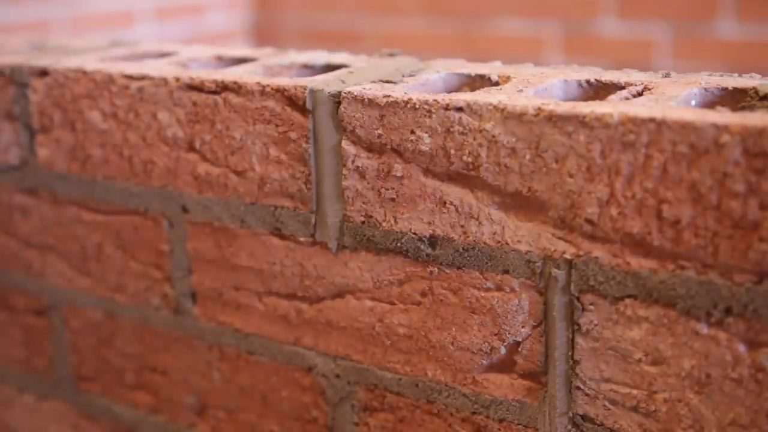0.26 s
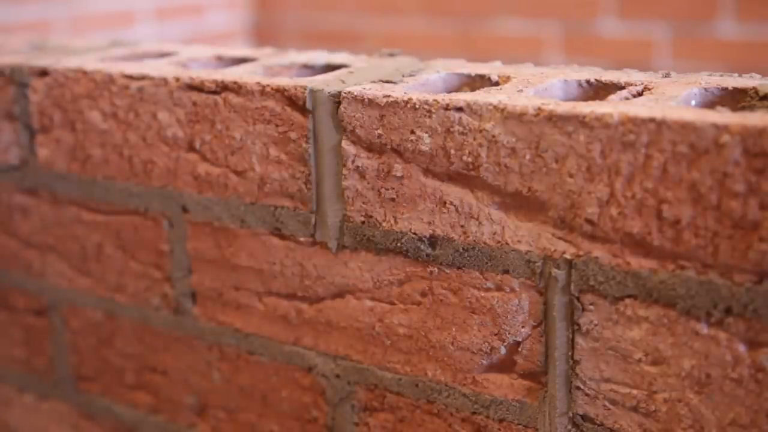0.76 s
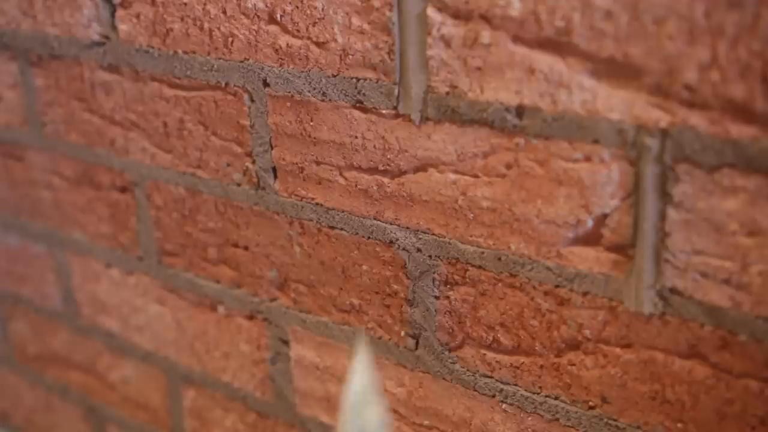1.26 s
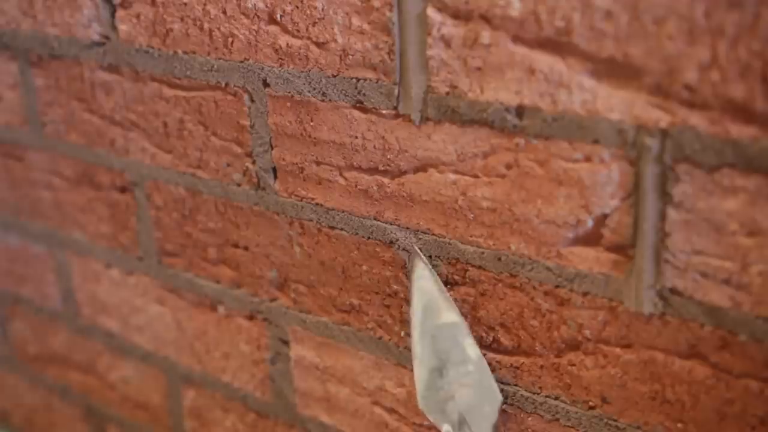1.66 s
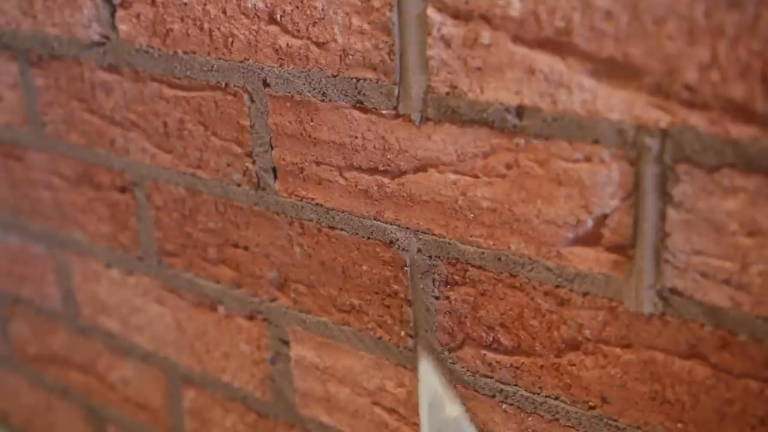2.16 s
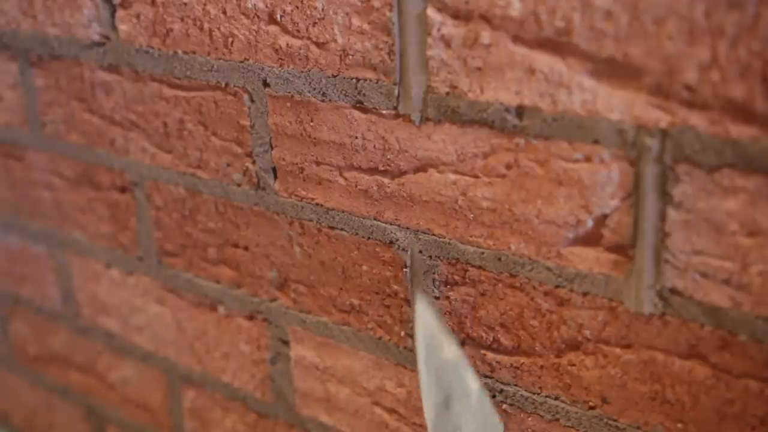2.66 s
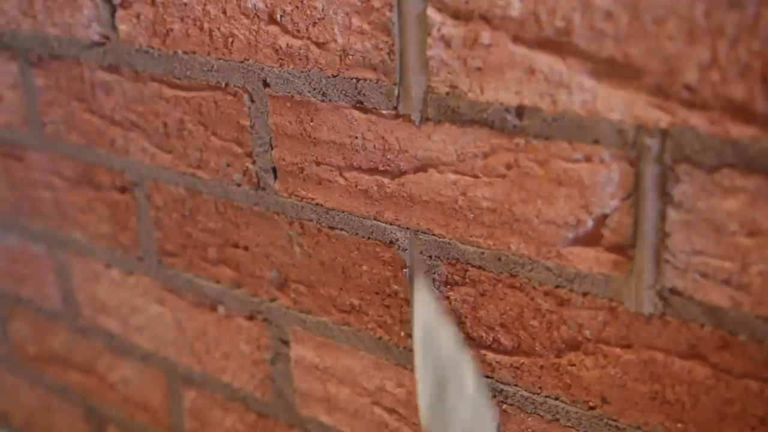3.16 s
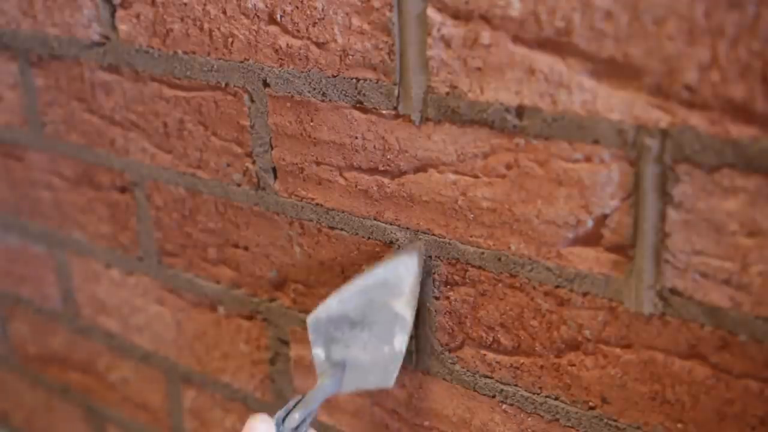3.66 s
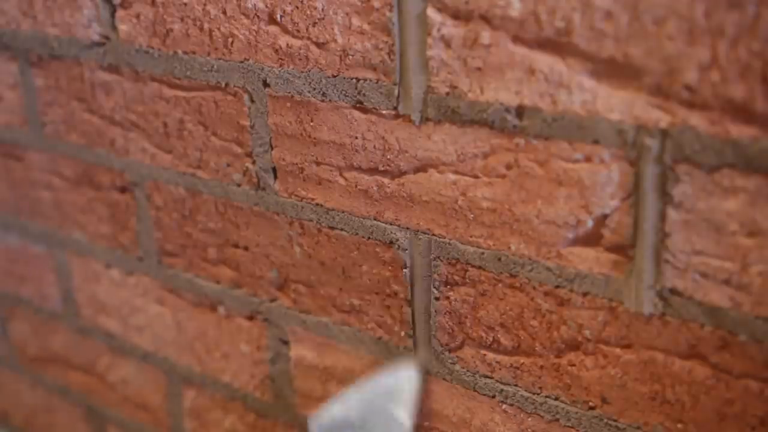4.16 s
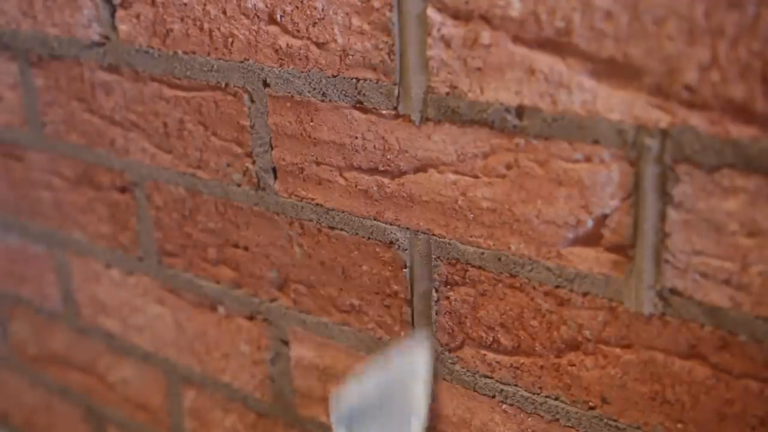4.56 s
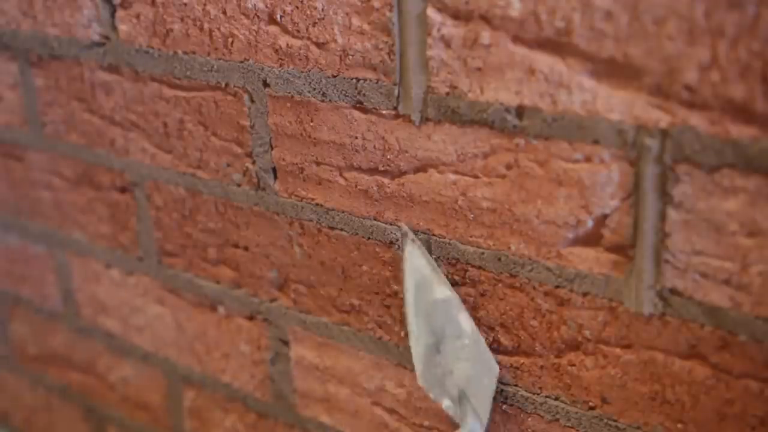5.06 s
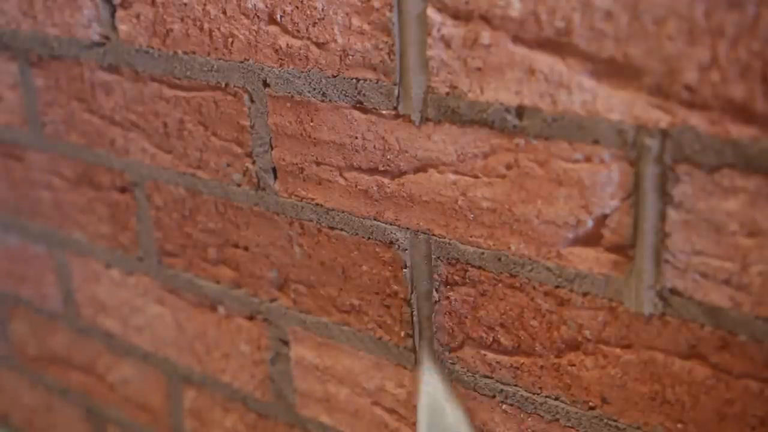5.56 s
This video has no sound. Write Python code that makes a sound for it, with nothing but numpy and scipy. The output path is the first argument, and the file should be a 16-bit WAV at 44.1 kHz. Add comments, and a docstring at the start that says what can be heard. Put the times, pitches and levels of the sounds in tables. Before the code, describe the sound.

After one light tap, a trowel tip scratches repeatedly through sandy mortar, its blade ringing briefly, over faint distant traffic.

```python
"""Outdoors at a brick wall, a steel pointing trowel works the fresh mortar joints.
Far traffic hums and handling rustles softly. The trowel is tapped once and bounces, and crumbs tick on
the wall. Then its tip is drawn six times along a joint: sand grinds under the blade, which the wall
muffles, and the tip catches on coarse grains and squeaks. Each time it lifts off, the blade rings on."""
import sys
import numpy as np
from scipy import signal
from scipy.fft import rfft, irfft, next_fast_len
from scipy.io import wavfile
from scipy.ndimage import uniform_filter1d

SR = 44100
rng = np.random.default_rng(int(sys.argv[2]) if len(sys.argv) > 2 else 0)


def unload_audio(sound):
    """Save the sound as a 16-bit wav file, at the path given as the first command line argument."""
    columns = np.transpose(np.atleast_2d(sound))
    # keep every value between -1 and 1, then stretch to whole-number steps
    steps = np.round(np.clip(columns, -1, 1) * 32767)
    wavfile.write(sys.argv[1], SR, steps.astype(np.int16))


N = 257103

# Noise colours, or how strong each noise is from low to high pitch: f/Hz, level/dB
AIR_COLOUR = [(15, -53.5), (25, -29.5), (53, -11.5), (80, -11.5), (105, -4), (130, -5.5), (300, -6),
              (380, -3.5), (450, -9.5), (650, -6.5), (1070, -9.5), (1600, -17), (2600, -29), (5000, -28.5),
              (16000, -40)]
HANDLING_COLOUR = [(150, -8.5), (400, 0), (1300, -6), (2300, -6.5), (5000, -12.5), (10000, -15.5),
                   (16000, -22.5)]
THUD_COLOUR = [(90, -40), (140, -20), (190, -7), (350, -5), (500, 21.5), (680, 16), (780, 11.5), (950, 18),
               (1200, 11.5), (1480, 20), (1800, -68), (3000, 4), (6000, -36)]
CRACK_COLOUR = [(200, -36), (700, -20), (1500, 3), (2400, -3.5), (4000, 0.5), (5700, -0.5), (7000, -4),
                (12000, -16.5), (16000, -25)]
# Soft rustles of handling: middle t/s, level/dB, half length/s
RUSTLE_SWELLS = [(0.13, -57, 0.067), (0.312, -53.5, 0.038), (0.395, -47.5, 0.038), (0.545, -57, 0.058),
                 (1.223, -51, .05)]

# A mode is one tone that a thing rings with; t60 is the time a sound takes to fade by 60 dB.
# Modes of what the trowel lands on: f/Hz, level/dB, t60/s
LANDING_MODES = [(176, -7, 0.25), (219, -13.5, 0.36), (298, -0.5, 0.083), (360, -6, 0.047), (502, 2, 0.18),
                 (518, -14, 0.18), (681, 2.5, 0.21), (866, 10, 0.053), (967, 7, 0.049), (1004, -14, 0.15),
                 (1110, -2, 0.035), (1470, -4, 0.049)]
# Modes of the blade pressed on the joint: f/Hz, width/Hz, level/dB
PRESSED_MODES = [(417, 260, -26), (822, 210, -20.5), (1880, 130, -22.5), (2730, 47, -36), (2838, 135, 1),
                 (3038, 200, -6.5), (3270, 110, -23.5), (4300, 110, -28), (4452, 94, 6.5), (4546, 570, -11),
                 (5300, 100, -4), (5780, 140, -1.5), (5960, 260, -18.5), (7270, 160, -11.5),
                 (8260, 400, -11), (9290, 2500, -12), (10040, 140, -10.5), (10570, 260, -14),
                 (10960, 810, -13), (13910, 450, -18), (13900, 660, -20.5)]
# Borders between its body, 3 kHz bend, 4.4 kHz bend and treble: f/Hz
PRESSED_EDGES_HZ = [2300, 3700, 5000]
# Modes of the blade ringing freely: f/Hz, level/dB, t60/s
FREE_MODES = [(645, -5, 0.65), (1384, 2, .28), (2800, 3, 0.21), (3090, -20.5, .2), (3170, -21, 0.1),
              (3474, -4.5, 0.64), (4426, 4, 0.18), (4490, -7.5, 0.24), (4870, -17, 0.075),
              (5800, -14.5, 0.21), (7830, -23, 0.11)]
# Borders between its slow flexing, 2.8 kHz bend, 3.5 kHz twist and upper modes: f/Hz
FREE_EDGES_HZ = [2000, 3300, 3900]

# Crumbs tick on the wall: t/s, level/dB
CRUMB_TICKS = [(0.7429, -45.5), (0.77, -46.5), (.8143, -51), (0.8428, -52), (0.907, -63), (1.072, -52),
               (1.32, -53)]
# "Angle" is how much the tilt of the blade favours its 4.4 kHz bend over the 3 kHz one.
# The tip lands or catches hard: t/s, level/dB, angle/dB, crunch t60/s
TIP_CATCHES = [(1.8825, -51, -2, 0.081), (2.56, -36, -4, 0.016), (2.7317, -37.5, -1, .03),
               (2.8502, -28.5, 0, 0.11), (2.8604, -22.5, 1.5, 0.061), (2.878, -28.5, 1.5, 0.061),
               (3.145, -26, 4.5, 0.014), (3.1488, -14, 2, 0.037), (3.1684, -20, 1.5, 0.04),
               (3.237, -34.5, 3, 0.12), (3.3322, -39, -4, 0.042), (3.848, -49, -7, .054),
               (4.4765, -20, -4.5, 0.071), (4.509, -29.5, 0.5, 0.054), (4.5327, -26, -2.5, 0.11),
               (4.5848, -27.5, -3.5, 0.16), (4.6751, -24, -3.5, .1), (4.695, -16, -5.5, 0.057),
               (5.232, -29, -1, 0.017), (5.245, -32.5, -4.5, 0.12), (5.2708, -33, -6, 0.022),
               (5.5171, -24.5, 0.5, 0.084)]
# Strokes along the joint:
# touch-down t/s, lift-off t/s, drag/dB, speeding up/s, slowing down/s, angle/dB, ring at lift-off/dB
JOINT_STROKES = [(1.937, 2.267, -37.5, .16, 0.052, 1, -54.5), (2.558, 2.888, -36.5, 0.11, .03, 0, -37),
                 (3.143, 3.337, -35, .01, 0.048, -6.5, -28), (3.843, 4.214, -36, .22, 0.089, -7, -47),
                 (4.473, 4.707, -32.5, .01, 0.033, -9, -15), (5.227, 5.537, -37.5, 0.2, 0.042, 2.5, -35.5)]
# The tip squeaks: t/s, length/s, f/Hz, level/dB
TIP_SQUEAKS = [(3.148, .016, 4530, -19.5), (3.163, 0.014, 4570, -20.5), (4.481, 0.032, 3072, -16),
               (4.534, .009, 2960, -20.5), (4.686, 0.0092, 2800, -6.5), (5.233, 0.02, 4330, -22.5)]

TAP_S, BOUNCE_S, TAP_BLADE_DB = .6002, .027, -16   # the tap, the gap between bounces, the steel's level
TIME = np.arange(N) / SR
HIT_TIME = TIME[:SR // 4]


def from_db(db):
    return 10 ** (np.asarray(db) / 20)


def rms_one(x):
    return x / np.sqrt(np.mean(x ** 2) + 1e-20)


def peak_one(x, size=176):
    """Scale so that the loudest few milliseconds have rms 1."""
    return x / np.sqrt(uniform_filter1d(x ** 2, size).max() + 1e-20)


def add(out, s, sound):
    """Mix a sound in at s seconds."""
    at = round(s * SR)
    out[at:at + len(sound)] += sound[:N - at]


def fade(t, t60):
    """Exponential decay from 1."""
    return np.exp(-np.log(1000) * t / t60)


def noise(colour, size=N):
    """Noise with a (Hz, dB) colour; rms 1."""
    hz, db = np.transpose(colour)
    count = next_fast_len(size)
    bins = np.maximum(np.fft.rfftfreq(count, 1 / SR), 1)
    gain = from_db(np.interp(np.log(bins), np.log(hz), db))
    return rms_one(irfft(rfft(rng.standard_normal(count)) * gain, count)[:size])


def drift(per_s, size=N):
    """Wander to a new random value per_s times a second, with an average strength (rms) of 1."""
    targets = rng.standard_normal(size // 20)
    return rms_one(np.interp(TIME[:size] * per_s, np.arange(size // 20), targets))


def swell(s, db, half_s):
    """A level that rises and falls in a bell shape around s seconds."""
    return from_db(db) * np.exp(-((TIME - s) / half_s) ** 2)


def far_traffic(air_db=-54, engine_hz=128.4, engine_db=-66.5, throb_db=1.5):
    """Far traffic and air, with one droning engine that grows louder once."""
    air = noise(AIR_COLOUR) + from_db(-19) * noise(AIR_COLOUR) * np.array([[1], [-1]])
    pitch_hz = engine_hz * (1 + 0.016 * drift(8.9))
    engine = np.sin(2 * np.pi * np.cumsum(pitch_hz) / SR) * from_db(throb_db * drift(16))
    engine_level = from_db(engine_db) + swell(s=5.07, db=-57, half_s=0.24)
    return from_db(air_db) * air + engine_level * rms_one(engine)


def rustling(flutter_db=0.99):
    """Handling makes soft swells of noise over a faint stirring."""
    level = swell(s=0.73, db=-60.5, half_s=1) + sum(swell(*row) for row in RUSTLE_SWELLS)
    return level * noise(HANDLING_COLOUR) * from_db(flutter_db * drift(89.85))


def resonate(x, hz, width_hz):
    """Let through a band of pitches around hz."""
    r = np.exp(-np.pi * width_hz / SR)
    feedback = [1, -2 * r * np.cos(2 * np.pi * hz / SR), r * r]
    return signal.lfilter(np.array([1, 0, -1]) * (1 - r * r) / 2, feedback, x + 1e-18)


def pressed_blade(force, detune=0, damping=1, sway_db=0):
    """A force shakes the muffled blade. Gives four parts: body, 3 kHz bend, 4.4 kHz bend, treble."""
    parts = np.zeros((4, len(force)))
    for hz, width_hz, db in PRESSED_MODES:
        shifted_hz = hz * (1 + detune * rng.standard_normal())   # the point of contact shifts each mode
        mode = resonate(resonate(force, shifted_hz, width_hz * damping), shifted_hz, width_hz * 3.2)
        if sway_db:   # modes grow and shrink as the tip travels
            mode = mode * from_db(sway_db * drift(22.005, size=len(force)))
        parts[np.searchsorted(PRESSED_EDGES_HZ, hz)] += from_db(db) * mode
    return parts


def contacts():
    """The tap, three weakening bounces and the crumbs: t/s, thud/dB, crack/dB, blade/dB, crack t60/s."""
    taps = [(TAP_S + k * BOUNCE_S, -17.5 - 10 * np.log2(k + 1), -23 - 3.5 * k, TAP_BLADE_DB - 5 * k, .082)
            for k in range(4)]
    crumbs = [(s, db - 3, db, db - 11, 0.034) for s, db in CRUMB_TICKS]
    return taps + crumbs


def tapping(lowest_hz=150):
    """The trowel lands and chatters to rest, then crumbs tick: each is a thud, a crack and a clink."""
    out, size = np.zeros(N), len(HIT_TIME)
    for s, thud_db, crack_db, blade_db, crack_t60 in contacts():
        modes = sum(from_db(db) * rng.choice([-1, 1]) * np.sin(2 * np.pi * hz * HIT_TIME)
                    * fade(HIT_TIME, t60) for hz, db, t60 in LANDING_MODES)
        dull_noise = peak_one(noise(THUD_COLOUR, size) * fade(HIT_TIME, t60=0.092))
        thud = peak_one(peak_one(modes) + from_db(-3) * dull_noise)
        crack = peak_one(noise(CRACK_COLOUR, size) * fade(HIT_TIME, crack_t60))
        knock = signal.unit_impulse(size)
        body, low_bend, high_bend, treble = pressed_blade(knock, detune=0.0082, damping=0.38)
        hardness = from_db(0.9 * (blade_db - TAP_BLADE_DB))   # lighter bounces are duller
        if s == TAP_S:   # at first the wall holds the 3 kHz bend still, and the treble is sharper
            low_bend, treble = from_db(-21) * low_bend, from_db(6.5) * treble
        clink = peak_one(body + low_bend + high_bend + hardness * treble)
        add(out, s, from_db(thud_db) * thud + from_db(crack_db) * crack + from_db(blade_db) * clink)
    return signal.sosfilt(signal.butter(4, lowest_hz, "high", fs=SR, output="sos"), out)


def free_blade(flex_db=-28, bend_db=0, twist_db=-31.5, upper_db=0):
    """One ring of the free blade. The defaults suit lifting off, which hardly flexes or twists it."""
    t = TIME[:SR]
    family_db = [flex_db, bend_db, twist_db, upper_db]
    ring = np.zeros(SR)
    for hz, db, t60 in FREE_MODES:
        level = from_db(db + family_db[np.searchsorted(FREE_EDGES_HZ, hz)])
        ring += level * np.sin(2 * np.pi * hz * t) * fade(t, t60)
    return ring * (1 - fade(t, 0.0065))


def ringing(brush_s=1.163):
    """Off the wall the blade rings: after the tap and first bounce, when brushed, after each stroke."""
    out = np.zeros(N)
    add(out, TAP_S, free_blade(flex_db=-27, bend_db=-29, twist_db=-42.5, upper_db=-29.5))
    add(out, TAP_S + BOUNCE_S, from_db(-25.5) * free_blade(upper_db=-2.5))
    add(out, brush_s, free_blade(flex_db=-np.inf, bend_db=-np.inf, twist_db=-43, upper_db=-np.inf))
    for _, lift, *_, angle_db, ring_db in JOINT_STROKES:
        add(out, lift, from_db(ring_db) * free_blade(upper_db=2 * angle_db))
    return out


def wall_echoes(x, t60=.62, echo_db=-24.5, dull_hz=10000):
    """Nearby brickwork sends back a faint tail of echoes, different on each side."""
    tails = rng.standard_normal((2, SR)) * fade(TIME[:SR], t60) * (1 - fade(TIME[:SR], 0.054))
    tails /= np.sqrt(np.sum(tails[0] ** 2))
    tails = signal.sosfilt(signal.butter(1, dull_hz, fs=SR, output="sos"), tails)
    shared, side = (signal.fftconvolve(x, tail)[:N] for tail in tails)
    return from_db(echo_db) * (shared + 0.12 * side * np.array([[1], [-1]]))


def grit(per_s, spread_db, size=N):
    """Sand grains of uneven size snap under the tip at random moments."""
    strength = from_db(spread_db * np.minimum(rng.exponential(1, size), 4))
    return (rng.random(size) < per_s / SR) * strength * rng.choice([-1, 1], size)


def catches(snap=7.3):
    """A coarse grain breaks with a snap and a short crunch, shaking the blade."""
    out = np.zeros(N)
    for s, db, angle_db, t60 in TIP_CATCHES:
        fragments = grit(per_s=5000, spread_db=1.5, size=len(HIT_TIME))
        force = rms_one(fragments) * fade(HIT_TIME, t60)
        force[0] += snap
        parts = pressed_blade(force, detune=0.012, damping=0.61, sway_db=5.5)
        treble_db = -2.5 + 2 * np.log2(t60 / 0.038)   # a longer crunch is also brighter
        shares_db = [-22 - angle_db, -2 - angle_db, angle_db, treble_db]
        add(out, s, sum(from_db(db + share) * peak_one(part) for share, part in zip(shares_db, parts)))
    return out


def stroke_motion(landing_speed=0.17, slowed_db=-7, release_s=.012):
    """Drag, blade angle and progress (0-1): each stroke gathers speed, holds, slows and lifts off."""
    drag, angle, progress = np.zeros(N), np.ones(N), np.zeros(N)
    for start, lift, db, rise_s, slow_s, angle_db, _ in JOINT_STROKES:
        begun = TIME >= start
        t = TIME[begun]
        rise = np.sin(np.pi / 2 * np.minimum((t - start) / rise_s, 1))
        speed = landing_speed + (1 - landing_speed) * rise
        slowing = from_db(slowed_db * np.clip(1 - (lift - t) / slow_s, 0, 1))
        last_grains = np.exp(-np.clip((t - lift) / release_s, 0, 20))
        drag[begun] = from_db(db) * speed * slowing * last_grains
        angle[begun] = from_db(angle_db)
        progress[begun] = np.minimum((t - start) / (lift - start), 1)
    return drag, angle, progress


def scraping(coarse_db=14, sand_db=-9, usual_drag_db=-38):
    """A stream of grains shakes the blade; the drag is lumpy, and crushed sand hisses by itself."""
    drag, angle, progress = stroke_motion()
    lumps = from_db(0.4 * drift(130) + 1.14 * drift(28))
    grains = grit(per_s=9000, spread_db=3) + from_db(coarse_db) * grit(per_s=24, spread_db=3)
    body, low_bend, high_bend, treble = pressed_blade(grains * lumps, sway_db=3.5)
    blade_rms = np.std(body + low_bend + high_bend + treble)
    keep_highs = signal.butter(2, 5000, "high", fs=SR, output="sos")
    sand = signal.sosfilt(keep_highs, grit(per_s=7000, spread_db=1) * lumps)
    bends = from_db(-0.5) * (body + low_bend + from_db(-2) * angle * high_bend) / blade_rms
    # The treble is strongest just past halfway, where the tip runs fastest.
    treble_arch = from_db(3.5 * (np.sin(np.pi * progress ** 1.2) - 1))
    hiss = (treble / blade_rms + from_db(sand_db) * rms_one(sand)) * treble_arch
    brightness = (drag / from_db(usual_drag_db)) ** 0.26   # a harder drag is brighter
    return gap_echo(drag * (bends + brightness * hiss), progress)


def gap_echo(x, progress, start_ms=.34, end_ms=.22, strength=0.17):
    """The echo between blade and wall shortens along each stroke, so its colouring glides upward."""
    lag_s = (start_ms + (end_ms - start_ms) * progress) / 1000
    earlier = np.round((TIME - lag_s) * SR).astype(int)
    return (x + strength * x[np.clip(earlier, 0, N - 1)]) / np.hypot(1, strength)


def squeaks(waver=0.02, overtone_db=-24):
    """For a few milliseconds the tip sticks and slips in step with one bend of the blade."""
    out = np.zeros(N)
    for s, length, hz, db in TIP_SQUEAKS:
        count = int(length * SR)
        phase = 2 * np.pi * np.cumsum(hz * (1 + waver * drift(880)[:count])) / SR
        tone = np.sin(phase) + from_db(overtone_db) * np.sin(2 * phase)
        add(out, s, from_db(db) * signal.windows.tukey(count, .5) * tone)
    return out


def scene():
    """The trowel close in front, the open air around it."""
    trowel = scraping() + catches() + squeaks() + ringing() + tapping()
    return trowel + rustling() + wall_echoes(trowel) + far_traffic()


def record(dry, hiss_db=-59.5, cutoff_hz=15900):
    """Each channel adds its own faint hiss; the highest pitches are cut steeply."""
    hiss = from_db(hiss_db) * rng.standard_normal((2, N))
    return signal.sosfilt(signal.ellip(10, .1, 80, cutoff_hz, fs=SR, output="sos"), dry + hiss)


dry = scene()
out = record(dry)
unload_audio(out)
```